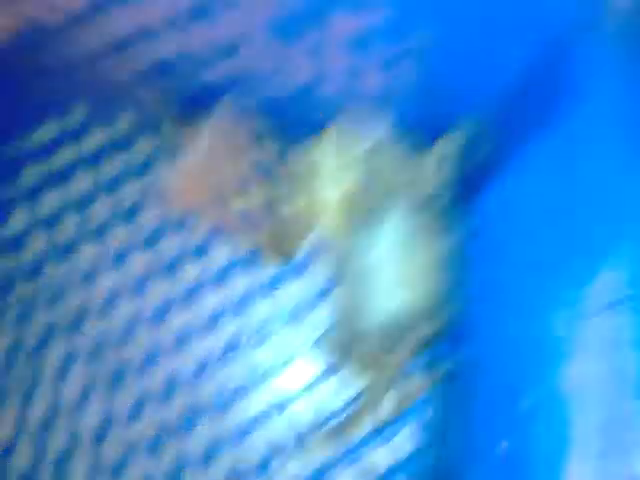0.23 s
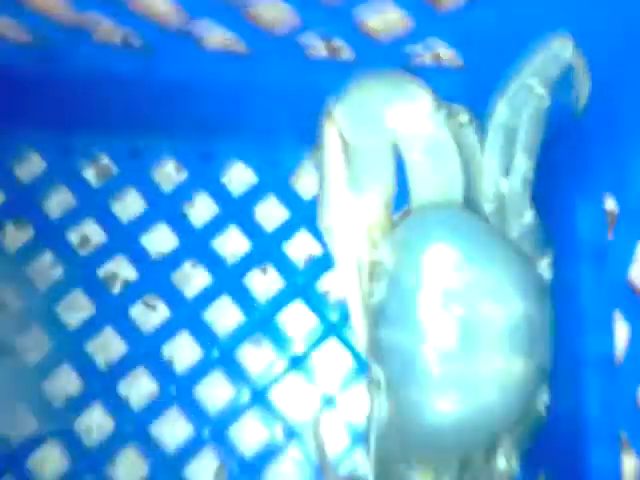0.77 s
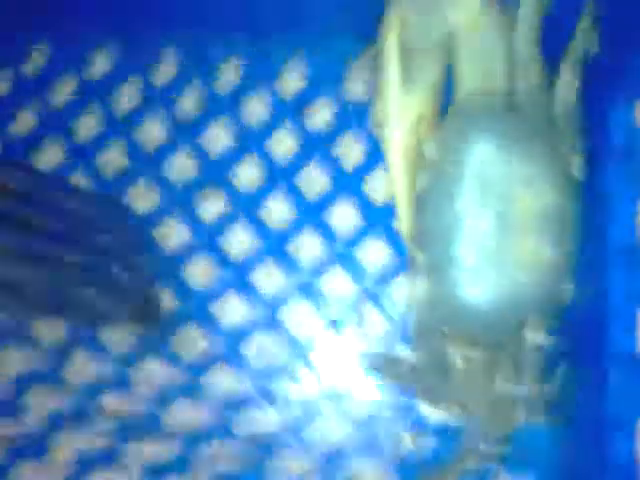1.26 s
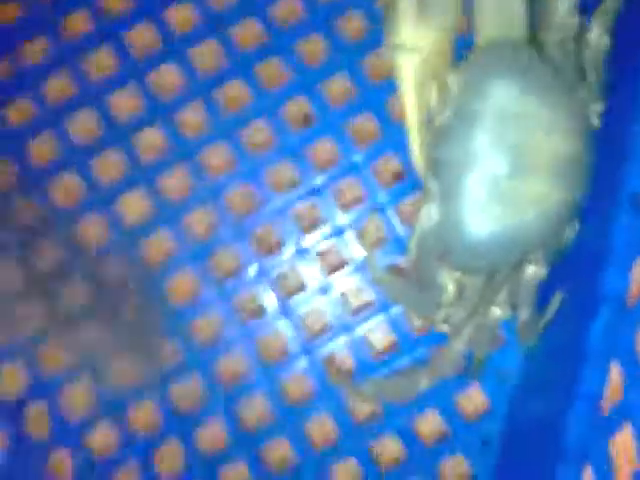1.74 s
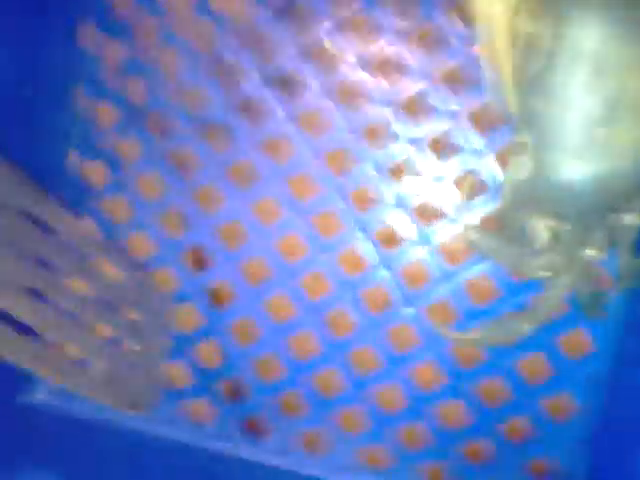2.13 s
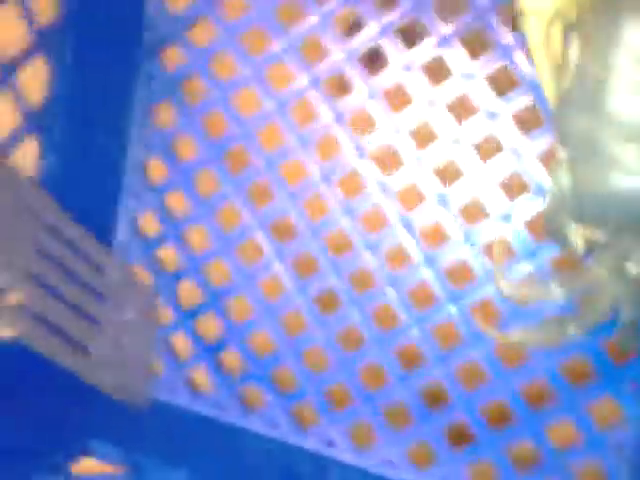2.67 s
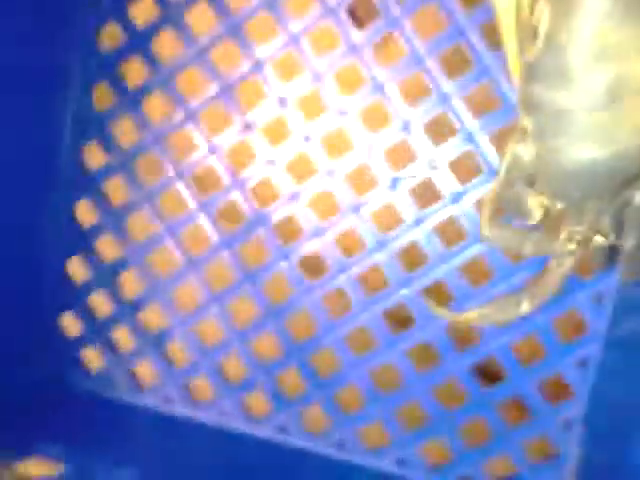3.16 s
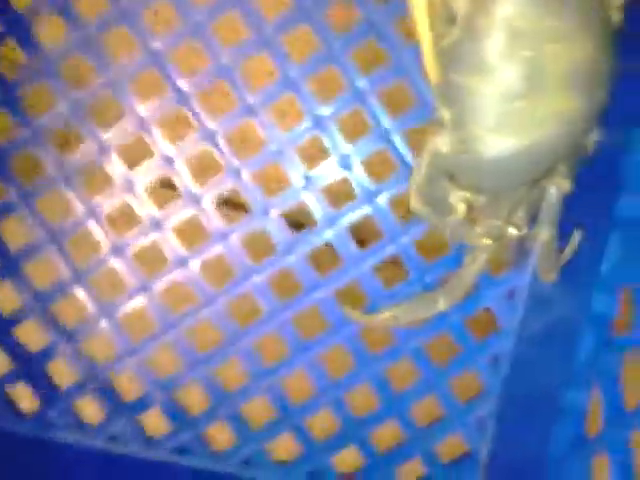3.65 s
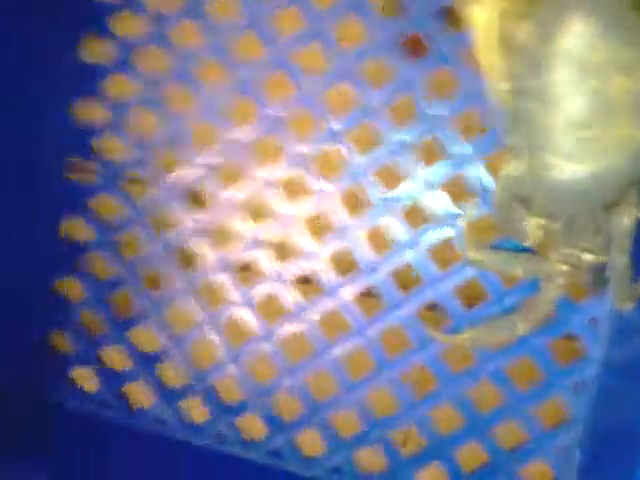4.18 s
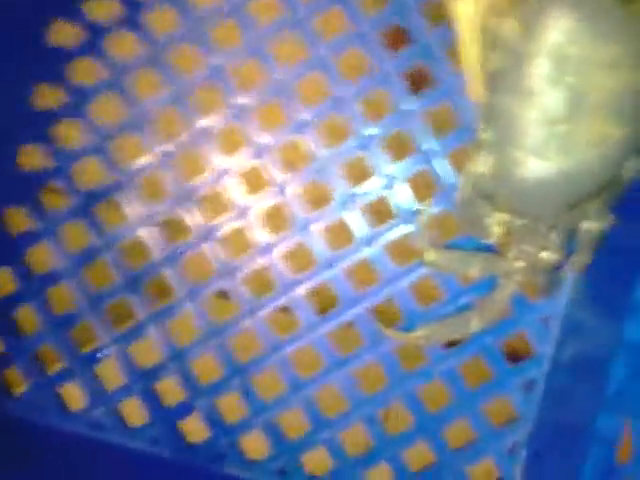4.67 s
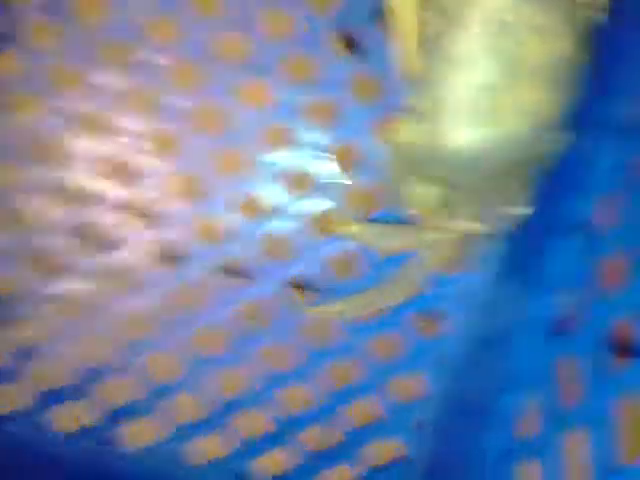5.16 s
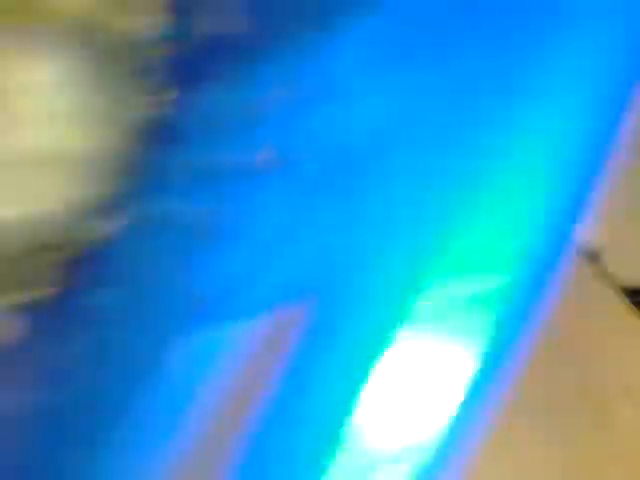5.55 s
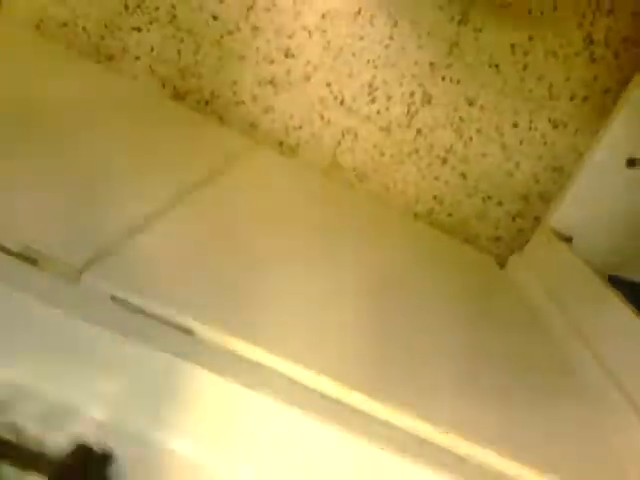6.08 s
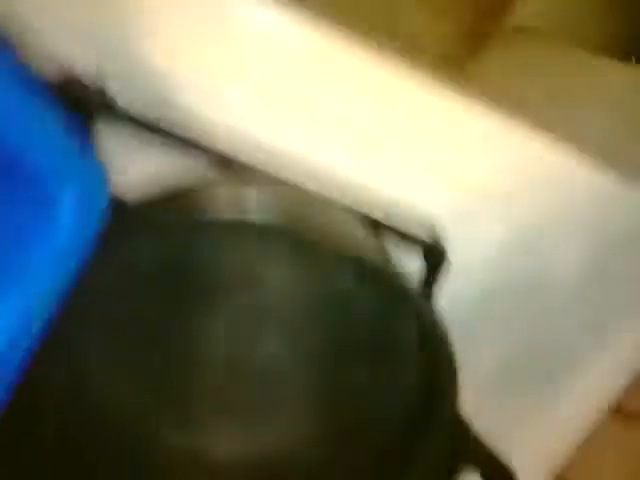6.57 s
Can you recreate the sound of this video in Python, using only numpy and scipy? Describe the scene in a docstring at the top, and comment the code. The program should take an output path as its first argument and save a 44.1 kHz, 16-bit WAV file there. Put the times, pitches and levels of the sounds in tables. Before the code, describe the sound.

Hard leg tips tick, skid and scratch over ribbed plastic, irregularly and close up. A struck steel spatula rings early, and again more damped in the second half. Knocks grow dense in the middle, with two overloaded loud clatters and low crate bumps, then thin out to scrapes and small clicks. Short bright kitchen echo, faint steady room noise, low hand rumble, dull telephone-like sound.

```python
"""Crab in a plastic crate

A crab scrambles in a plastic crate on a kitchen floor: leg tips and claws tap, drag and squeak, noise bursts
and slips exciting crate resonances; a struck steel spatula rings as decaying, beating sine pairs.
A small hard room answers with noise tails; room noise and handling rumble lie beneath.
A hand-held phone passes a narrow voice band and overloads on the loudest knocks."""
import sys
import numpy as np
from scipy import signal
from scipy.fft import rfft, irfft, next_fast_len
from scipy.io import wavfile
from scipy.ndimage import uniform_filter1d, map_coordinates

SR = 44100
rng = np.random.default_rng(int(sys.argv[2]) if len(sys.argv) > 2 else 0)


def pcm_store(signal):
    """Save signal as 16-bit PCM."""
    levels = np.round(np.clip(np.atleast_2d(signal), -1, 1) * 32767)
    wavfile.write(sys.argv[1], SR, levels.astype(np.int16).T)


N = 300762


def amp(db):
    """dB to gain."""
    return 10 ** (np.asarray(db) / 20)


def unit(x):
    """Scaled to rms 1."""
    return x / np.sqrt(np.mean(x ** 2) + 1e-20)


def along(points, hz):
    """(Hz, value) points interpolated on a log frequency axis."""
    point_hz, value = np.transpose(points)
    return np.interp(np.log(hz + 1), np.log(point_hz + 1), value)


def curves(rows):
    """One value per sample for each column after the time."""
    time_s, *columns = np.transpose(rows)
    return [np.interp(np.arange(N) / SR, time_s, column) for column in columns]


def wobble(knots_per_s):
    """A smooth random curve through normally distributed knots."""
    knots = rng.standard_normal(int(N * knots_per_s / SR) + 4)
    return map_coordinates(knots, [np.arange(N) * knots_per_s / SR])


def filtered(x, response):
    """x times a complex response of frequency."""
    size = next_fast_len(x.shape[-1] + 8192)
    spectrum = rfft(x, size) * response(np.fft.rfftfreq(size, 1 / SR))
    return irfft(spectrum, size)[..., :x.shape[-1]]


# Crate resonances. Each row: centre in Hz, width in Hz, level in dB.
CRATE_MODES = [(257, 140, -7.5), (481, 90, -2), (632, 79, -2), (791, 66, -1), (924, 99, -1.5),
               (1165, 245, -2), (1311, 169, 0), (1538, 157, 0), (1762, 222, -0.5), (1957, 187, 2),
               (2157, 225, 2), (2333, 310, 0.5), (2651, 266, 0.5), (2995, 250, -0.5), (3260, 330, 0),
               (3552, 460, -1), (3920, 400, -1.5)]
CRATE_HZ = np.transpose(CRATE_MODES)[0]


def crate(extra_db):
    """Parallel resonances of alternating sign, each raised by its extra dB."""
    centre_hz, width_hz, db = np.transpose(CRATE_MODES)[:, :, None]
    sign = (-1) ** np.arange(len(CRATE_MODES))[:, None]
    gain = sign * amp(db + np.reshape(extra_db, (-1, 1)))

    def response(f):
        damping = 1j * f * width_hz
        return np.sum(gain * damping / (centre_hz ** 2 - f * f + damping), axis=0)
    return response


# Taps on the crate. Each row: start in seconds, nominal peak in dB,
# brightness in dB from panel thud to tip click, loudest pitch in Hz.
TAPS = [(.154, -31.5, -3.5, 1230), (.272, -16, 42, 2760), (.37, -27.5, 34, 3500), (.626, -11, -8, 1300),
        (.748, -15.5, 52, 2880), (.773, -26, 13.5, 2920), (1.304, -31.5, 2, 1840), (1.382, -62, 25, 3200),
        (1.442, -40.5, 10, 3610), (1.535, -39, -9, 1150), (1.742, -28, -10, 891), (1.894, -36.5, 17, 2620),
        (1.92, -35, 1, 1400), (2.078, -40, -10, 840), (2.174, -31.5, 2.5, 1280), (2.282, -30.5, 0.5, 2160),
        (2.292, -25, -5.5, 1260), (2.394, -27, -4.5, 1540), (2.447, -29, 10, 2910), (2.478, -14, -14, 880),
        (2.609, -15, 15, 2180), (2.638, -28, -11, 2070), (2.728, -15, 35, 3250), (2.804, -21, -2.5, 1710),
        (2.863, -28, 0, 2200), (2.884, -31.5, 19, 1590), (2.975, -38.5, -11.5, 880),
        (3.001, -26.5, -10, 484), (3.047, -32.5, 2, 2160), (3.219, -4.5, 11, 2660), (3.231, 4.5, 4, 2670),
        (3.241, -2.5, 7, 1540), (3.251, -6.5, 14, 1980), (3.429, -19.5, 1.5, 2560), (3.444, -20, -4.5, 918),
        (3.476, -27.5, -13, 1670), (3.646, -33.5, -8, 1580), (3.753, -27.5, 13, 2250),
        (3.798, -31.5, 0, 1960), (3.916, -32, 1, 2550), (4.037, -30, -7, 2420), (4.07, -22.5, 7, 2640),
        (4.081, -12, -0.5, 2380), (4.085, -15, -15.5, 1970), (4.203, -14.5, 6, 1760), (4.4, -18.5, 1, 1820),
        (4.449, -16.5, -4, 1670), (4.496, -29.5, 2.5, 1674), (4.617, -36.5, -7, 1220),
        (4.658, -11, 5.5, 1740), (4.67, -21, -6.5, 1950), (4.717, 2.5, 26, 2630), (4.727, -1.5, 13, 2360),
        (4.767, -17, 29, 2630), (4.783, -14.5, -8.5, 1990), (4.817, -4.5, 11, 2550), (4.854, -19, -3, 1980),
        (4.883, -17, 8.5, 1740), (5.079, -36, 17, 1440), (5.194, -37.5, 47, 2420), (5.622, -28, 21, 2450),
        (5.689, -26.5, 16, 2610), (5.797, -25.5, 39, 2570), (5.952, -33.5, 36, 2550), (6.054, -34, 6, 1950),
        (6.128, -18, 5, 2390), (6.164, -5, 15, 1290), (6.339, -28.5, -0.5, 1208), (6.429, -30.5, 7, 1970),
        (6.477, -30.5, 19, 2730), (6.489, -28.5, 26, 2800), (6.522, -28.5, 46, 2400)]
RATTLE_T60_S, FIRST_CONTACT_DB = 0.052, 14.5
CREST_DB = 10.5  # nominal peak over rms
FLANK_DB = -6  # low and high resonances under the middle
THUD_SHARE, DEEP_SHARE = 0.67, 0.85  # part of the brightness taken from the low and the lowest resonances


def taps():
    """One sharp blow and a rattle of contacts; where it lands decides which resonances speak."""
    out, t = np.zeros(N + SR), np.arange(SR // 6) / SR
    for start_s, peak_db, bright_db, spot_hz in TAPS:
        tilt = [(250, FLANK_DB - DEEP_SHARE * bright_db),
                (600, FLANK_DB - THUD_SHARE * bright_db),
                (1400, 0),
                (3000, FLANK_DB + (1 - THUD_SHARE) * bright_db)]
        place_db = along(tilt, CRATE_HZ)
        place_db += 4 * np.exp(-(np.log(CRATE_HZ / spot_hz) / .12) ** 2)
        place_db += rng.normal(0, 1.5, len(CRATE_HZ))
        rattle = rng.standard_normal(len(t)) * amp(-60 * t / RATTLE_T60_S)
        rattle[0] = amp(FIRST_CONTACT_DB)
        knock = filtered(rattle, crate(place_db))
        knock /= np.std(knock[:SR // 150])
        out[round(start_s * SR):][:len(t)] += amp(peak_db - CREST_DB) * knock
    return out[:N]


# Crate bumping on the floor. Each row: start in seconds, boom level in dB.
BUMPS = [(.626, -57), (1.304, -41.5), (2.448, -55), (2.479, -55), (2.637, -50), (3.001, -47), (3.047, -46),
         (3.219, -30.5), (3.231, -20), (3.249, -31.5), (3.428, -52.5), (3.445, -51), (4.07, -43.5),
         (4.08, -36), (4.212, -43.5), (4.45, -49), (4.659, -43), (4.728, -44.5), (4.783, -46.5),
         (5.079, -59)]
BOOM_HZ, BOOM_T60_S, BOOM_RISE_S = 140.7, 0.13, .006


def bumps():
    """The whole crate flexes on the floor: one low decaying sine per bump."""
    out, t = np.zeros(N + SR), np.arange(SR // 6) / SR
    envelope = amp(-60 * t / BOOM_T60_S) * (1 - np.exp(-t / BOOM_RISE_S))
    boom = np.sin(2 * np.pi * BOOM_HZ * t) * envelope
    for start_s, db in BUMPS:
        out[round(start_s * SR):][:len(t)] += amp(db) * boom
    return out[:N]


# Legs dragging. Each row: time in seconds, rib scratch in dB.
DRAG = [(0, -64.5), (.21, -60), (.27, -56.5), (.8, -61.5), (1.12, -56), (1.4, -61.5), (1.96, -62.5),
        (2.3, -59), (2.5, -51.5), (3.1, -53.5), (3.6, -58), (3.8, -53.5), (3.93, -56), (4.5, -58.5),
        (5, -58), (5.36, -63.5), (5.6, -57), (5.95, -63.5), (6.5, -58), (6.82, -69)]
DRONE_DB, HISS_DB = -6.5, 1.5  # panel drone and tip hiss over the rib scratch
# Longer strokes over the ribs. Each row: start in seconds, length in seconds,
# rib scratch in dB, panel drone in dB, tip hiss in dB.
STROKES = [(1.064, 0.18, -55.5, -96, -52), (1.434, 0.18, -59, -73, -82), (1.906, 0.1, -43.5, -51, -47),
           (2.127, 0.065, -42, -62, -45), (2.289, 0.13, -45, -59, -51.5), (2.477, 0.069, -61, -45, -48.5),
           (2.795, 0.033, -41.5, -55, -48.5), (3.046, 0.11, -45, -60.5, -44.5),
           (3.461, 0.043, -40, -45.5, -55.5), (3.693, 0.056, -42, -49.5, -41),
           (3.748, 0.03, -43.5, -62, -45), (4.117, 0.058, -39, -53, -38), (4.162, 0.09, -30.5, -38, -29.5),
           (4.626, 0.058, -39, -53.5, -45.5), (4.889, 0.04, -40, -53, -69), (5.322, 0.092, -52, -68.5, -50),
           (5.601, 0.04, -60, -58, -66), (6.025, 0.09, -45.5, -54.5, -44.5),
           (6.102, 0.068, -33.5, -62, -34)]
# Skid after each tap: level over the tap's peak, decay time, drone over scratch.
SKID_DB, SKID_T60_S, SKID_DRONE_DB = -35.5, 0.34, -10.5


def drag():
    """Leg tips skid over the ribs: dense uneven slips in clumps excite scratch, drone and hiss bands."""
    force = amp(curves(DRAG)[0]) * amp([[0], [DRONE_DB], [HISS_DB]])
    t = np.arange(SR // 2) / SR
    for start_s, peak_db, *_ in TAPS:
        start = round(start_s * SR)
        skid = amp(peak_db + SKID_DB - 60 * t / SKID_T60_S)[:N - start]
        force[:, start:][:, :len(t)] += skid * amp([[0], [SKID_DRONE_DB], [HISS_DB]])
    for start_s, length_s, *stroke_db in STROKES:
        arc = np.sin(np.pi * np.arange(round(length_s * SR)) / (length_s * SR))
        force[:, round(start_s * SR):][:, :len(arc)] += amp(stroke_db)[:, None] * arc

    is_large = rng.random(N) < .08
    slips = rng.standard_normal(N) * amp(2.3 * rng.exponential(size=N) * is_large)
    slips *= amp(1.2 * wobble(35) + 2.5 * wobble(120))  # clumps
    scratch = (CRATE_HZ > 900) & (CRATE_HZ < 2300)
    drone, hiss = CRATE_HZ <= 900, CRATE_HZ >= 2300
    out = np.zeros(N)
    for push, band in zip(force, [scratch, drone, hiss]):
        rub = unit(filtered(slips, crate(np.where(band, 0, -60))))
        out += push * amp(wobble(25)) * rub
    return out


# Squeaks of a tip sticking and slipping evenly. Each row: start in seconds, length in seconds,
# mean slip rate in Hz, levels of partials 1, 2 and 3 in dB.
SQUEAKS = [(2.488, 0.058, 630, -38.5, -50, -69), (2.808, .04, 635, -38.5, -61, -60),
           (4.159, 0.072, 879, -54, -26, -31), (4.61, 0.049, 1257, -39, -53, -59),
           (5.602, 0.024, 488, -48, -70, -68), (6.055, 0.078, 478, -49.5, -59, -66),
           (6.185, 0.038, 479, -44.5, -48, -63.5), (3.266, 0.056, 3570, -24.5, -78, -80),
           (3.353, .03, 904, -37.5, -50, -60)]


def squeaks():
    """Stick-slip: three partials of a slightly unsteady slip rate under a rounded stroke."""
    out = np.zeros(N)
    for start_s, length_s, slip_hz, *partial_db in SQUEAKS:
        u = np.arange(round(length_s * SR)) / (length_s * SR)
        noise = rng.standard_normal((2, len(u)))
        pitch_drift, level_drift = uniform_filter1d(noise, 200, axis=1) * np.sqrt(200)
        phase = 2 * np.pi * np.cumsum(slip_hz * (1 + 0.0097 * pitch_drift)) / SR
        tone = sum(amp(db) * np.sin((k + 1) * phase) for k, db in enumerate(partial_db))
        stroke = np.sin(np.pi * u) ** .6 * amp(3 * level_drift)
        out[round(start_s * SR):][:len(u)] += tone * stroke
    return out


# Blows on the spatula. Each row: start in seconds, level in dB,
# how flat it is held on the crate from 0 to 1, free ringing before the next touch in seconds.
BLOWS = [(0.273, -32, 0, 0.46), (4.09, -32.5, 0.7, 0.25), (4.21, -43.5, 0.9, 0.175),
         (4.665, -27.5, 0.7, 0.22)]
# Blade modes, in Hz.
BLADE_HZ = [1136, 1394, 1550, 1692, 1992, 2115, 2340, 2745, 3245, 3611]
# The same modes. Each row: level in dB, t60 of the free blade in seconds,
# split to the beating partner in Hz, partner share of the free blade from -1 to 1.
BLADE_MODES = [(-6.5, 0.22, 0, 0), (-9.5, 0.3, 0, 0), (-20.5, 2.1, 3.5, -.2), (-15.5, 1.474, 4.5, 0.21),
               (-6.5, 2.2, 4, -.6), (-7, 1.5, 3, 0.9), (-7.5, .2, 0, 0.1), (0.5, .7, 2.5, -0.4),
               (3.5, 0.176, 0, 0.5), (-2.5, 3.56, 2.24, -0.1)]
HANDLE_HZ = BLADE_HZ[4]  # the mode left unmuted when the blade lies flat
TOUCH_T60_S = .3  # added damping after a touch, on all but the highest mode


def spatula():
    """The free blade rings in all modes; laid flat it keeps nearly one; waving flutters the ring."""
    out, t = np.zeros(N + 2 * SR), np.arange(2 * SR) / SR
    turning = amp(1.5 * wobble(14)[:len(t)])
    attack = 1 - np.exp(-t / .002)
    for start_s, blow_db, flat, free_s in BLOWS:
        for hz, (mode_db, t60_s, split_hz, share) in zip(BLADE_HZ, BLADE_MODES):
            muted = flat * (abs(hz - HANDLE_HZ) > 60)
            fade_db = -60 * t / t60_s * (1 + 0.82 * flat) - 25 * muted
            touched_s = np.maximum(t - free_s, 0)
            fade_db -= 60 * touched_s / TOUCH_T60_S * (hz < BLADE_HZ[-1])
            partner = np.sin(2 * np.pi * (hz + split_hz) * t)
            pair = np.sin(2 * np.pi * hz * t) + share * (1 - flat) * partner
            ring = amp(blow_db + mode_db + fade_db) * pair
            out[round(start_s * SR):][:len(t)] += ring * turning * attack
    return out[:N]


# Room decay. Each row: frequency in Hz, t60 in seconds.
KITCHEN = [(150, 0.37), (500, 0.4), (1500, 0.38), (3500, 0.34)]


def kitchen(x):
    """Decaying noise tails, each frequency at its own speed, redrawn every quarter second."""
    out, hop = np.zeros(N + SR), SR // 4
    for start in range(0, N, hop):
        hz, t, bins = signal.stft(rng.standard_normal(SR // 2), SR, nperseg=256)
        bins = bins * amp(-60 * t / along(KITCHEN, hz)[:, None])
        tail = signal.istft(bins, SR, nperseg=256)[1]
        wet = signal.fftconvolve(x[start:start + hop], tail / np.linalg.norm(tail))
        out[start + 180:][:len(wet)] += wet  # 4 ms later
    return out[:N]


# Room noise spectrum. Each row: frequency in Hz, relative density in dB per Hz.
AIR = [(59, -36.5), (100, -2.5), (692, -7), (855, -0.5), (1090, -24), (2250, 1.5), (3230, -5.5),
       (3700, 1.5), (4810, -40), (8140, -120)]


def room_noise():
    """Steady shaped noise whose level drifts slightly."""
    air = unit(filtered(rng.standard_normal(N), lambda hz: amp(along(AIR, hz))))
    return amp(-58.5 + 0.96 * wobble(2.1)) * air


# Handling rumble. Each row: time in seconds, level in dB.
HAND = [(0, -68), (1.2, -63), (1.6, -66), (2.6, -63.5), (3.5, -69), (4.5, -65), (5.4, -68), (6.82, -71)]
# Grip shifts. Each row: centre in seconds, level in dB.
JOLTS = [(0.469, -58.5), (0.629, -61), (1.07, -58), (1.9, -64.5), (2.24, -57.5), (3.25, -52.5), (4.73, -52),
         (6.17, -64)]
JOLT_HALF_WIDTH_S = 0.038


def handling():
    """The hand on the phone: lumpy low noise, swelling at each grip shift."""
    rumble_db = [(8, -17.5), (25, 0.0), (40, -5.0), (60, -9), (90, -10.5), (160, -28.5), (300, -92.5)]
    lumps = rng.standard_normal(N) * amp(2.5 * wobble(9))
    rumble = unit(filtered(lumps, lambda hz: amp(along(rumble_db, hz))))
    grip, t = amp(curves(HAND)[0]), np.arange(N) / SR
    for centre_s, db in JOLTS:
        grip += amp(db) * np.exp(-((t - centre_s) / JOLT_HALF_WIDTH_S) ** 2)
    return grip * rumble


def scene():
    """Crate and spatula, the room's answer to the crate, and the background."""
    knocks = taps() + bumps()
    rubs = squeaks() + drag()
    wet = kitchen(amp(-8.5) * knocks + amp(-9.5) * rubs)
    return (knocks + rubs + wet + spatula() + room_noise() + handling())[None]


# Voice band edge. Each row: frequency in Hz, gain in dB.
EDGE = [(20, 2.5), (3500, 0.5), (3750, -12), (3950, -25.5), (4050, -57.5), (4600, -110), (20000, -120)]
# Mirror image leaking just above the edge. Each row: frequency in Hz, gain in dB.
MIRROR = [(20, -120), (3900, -120), (4000, -46), (4150, -26), (4400, -40), (4600, -41), (5000, -120),
          (20000, -120)]
RATE_HZ, TOP_HZ = 8000, 16800


def record(dry):
    """Voice-rate sampling keeps the low band and a faint mirror; overload spreads loud peaks upward."""
    mirrored = 2 * dry * np.cos(2 * np.pi * RATE_HZ * np.arange(N) / SR)
    voice = filtered(dry, lambda hz: amp(along(EDGE, hz)))
    voice += filtered(mirrored, lambda hz: amp(along(MIRROR, hz)))
    clipped = voice / (1 + np.abs(voice / .7) ** 24) ** (1 / 24)
    return filtered(clipped - .0017, lambda hz: hz < TOP_HZ)  # small DC offset, then the top cut


dry = scene()
out = record(dry)
pcm_store(out)
```